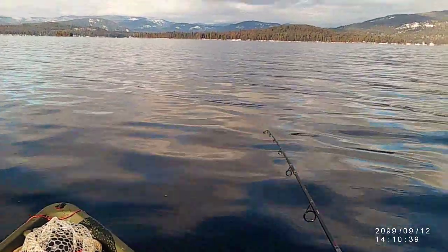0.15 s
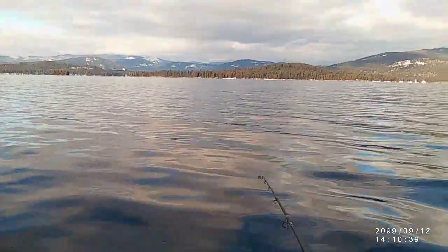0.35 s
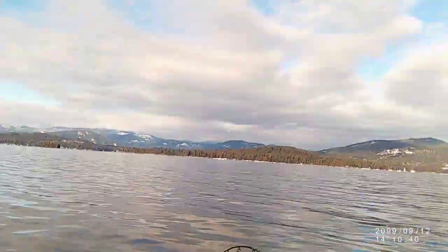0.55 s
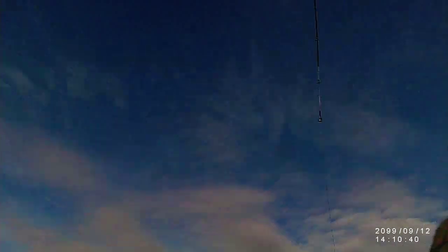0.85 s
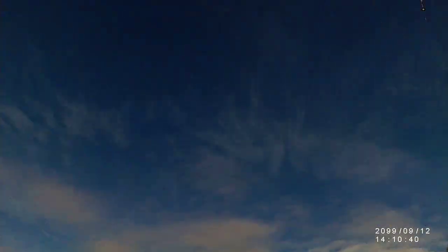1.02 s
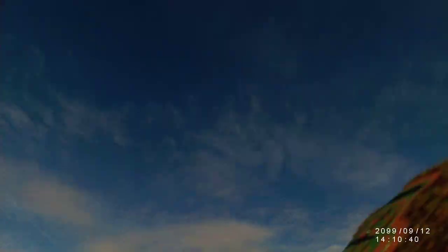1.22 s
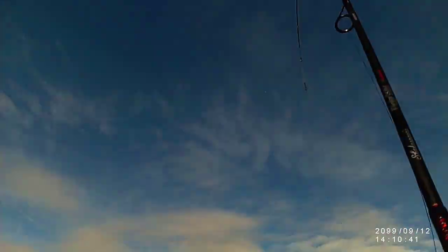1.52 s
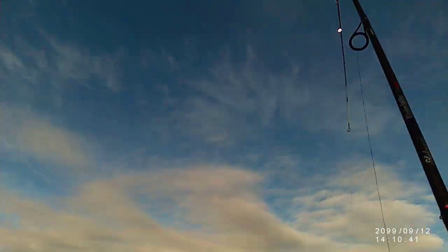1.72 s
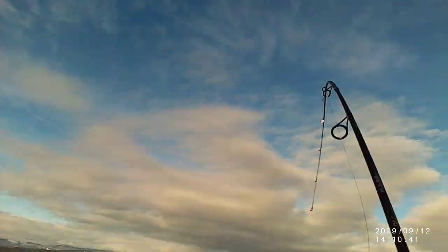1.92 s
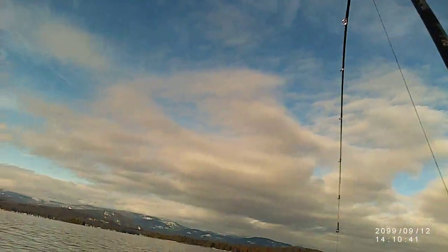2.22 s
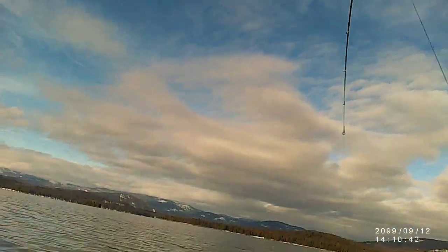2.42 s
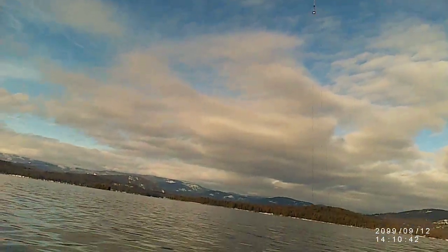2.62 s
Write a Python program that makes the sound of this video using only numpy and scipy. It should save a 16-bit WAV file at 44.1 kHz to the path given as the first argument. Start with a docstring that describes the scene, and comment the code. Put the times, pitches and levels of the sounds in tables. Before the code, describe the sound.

A spinning reel's gears whine and scrape in short bursts, clacking between pauses on a calm lake

```python
"""A spinning reel is cranked in five spurts, close to a small camera on a boat on a calm lake.
From the start, gear teeth whine as harmonics of an uneven tooth rate, over a rasp of dense grains and fine ticks.
Low noise makes the camera's rumble and the lake's wash; soft bumps and air pushes come and go.
Decaying tones knock in the handle from 0.1 s, and runs of clacks rattle the slack gears from 0.3 s.
The recorder keeps only the low treble, and adds faint hiss and whistles throughout."""
import sys
import numpy as np
from scipy import signal
from scipy.fft import rfft, irfft
from scipy.io import wavfile
from scipy.ndimage import uniform_filter1d

SR = 44100
rng = np.random.default_rng(int(sys.argv[2]) if len(sys.argv) > 2 else 0)


def dump_mix(stems):
    """Bounce the given channels to the path in sys.argv[1] as a 16-bit WAV at rate SR."""
    frames = np.atleast_2d(stems).T  # one column per channel
    limited = np.clip(frames, -1, 1)  # hard clip at full scale
    pcm = np.round(limited * 32767).astype(np.int16)
    wavfile.write(sys.argv[1], SR, pcm)


N = 121275
TIME, BINS = np.arange(N) / SR, np.fft.rfftfreq(N, 1 / SR)

# the crank's speed and its whine, before trims: t/s, tooth rate f/Hz, tone level/dB, octave level/dB
CRANK = [(0.0, 380, -58.5, -84), (0.03, 714, -54.5, -51), (0.05, 1180, -56.5, -55.5),
         (0.066, 1225, -68, -51.5), (0.102, 1458, -49.5, -64.5), (0.125, 831, -55, -47),
         (0.165, 1123, -58, -56.5), (0.19, 892, -82, -53.5), (0.219, 1384, -49, -53),
         (0.243, 1141, -71, -47.5), (0.271, 1731, -52, -57), (0.293, 1091, -62.5, -52.5),
         (0.311, 1743, -52, -66), (0.323, 1370, -56.5, -56), (0.345, 1480, -49.5, -65),
         (0.355, 997, -53.5, -56), (0.37, 539.8, -48.5, -50), (0.4, 350.2, -79, -70),
         (0.48, 251.3, -97, -71.5), (0.795, 340, -72, -73.5), (0.834, 400, -46, -53.5),
         (0.86, 498.2, -47, -55.5), (0.887, 601, -47.5, -45.5), (0.917, 733.3, -44, -56),
         (0.945, 520, -48.5, -52), (0.968, 389, -57.5, -70), (1.04, 421.5, -80.5, -57),
         (1.08, 748.6, -55, -55), (1.112, 1010, -55, -55), (1.135, 1190, -60.5, -53.5),
         (1.155, 1090, -55, -59), (1.195, 1340, -63, -61.5), (1.208, 1293, -51, -57),
         (1.232, 1687, -62, -61), (1.25, 1564, -53.5, -56), (1.272, 1780, -63, -67.5),
         (1.286, 1710, -48.5, -48.5), (1.305, 1777, -68, -66), (1.325, 1117, -47.5, -53),
         (1.352, 1198, -54, -47), (1.38, 419, -52, -56.5), (1.46, 251.1, -98, -90), (1.54, 328.7, -64, -52),
         (1.568, 430.5, -48, -56), (1.61, 654, -58.5, -49.5), (1.635, 730.5, -50, -49.5),
         (1.652, 886, -45.5, -50.5), (1.675, 1346, -52.5, -48.5), (1.69, 1325, -53, -58.5),
         (1.71, 799.6, -49, -44), (1.73, 833, -52.5, -54.5), (1.76, 1001, -49, -54.5),
         (1.78, 895, -51, -54.5), (1.803, 1152, -50, -50), (1.818, 1154, -44.5, -51),
         (1.85, 1010, -72, -59), (1.88, 1351, -52.5, -54), (1.9, 1174, -56, -60), (1.935, 1098, -69, -55),
         (1.977, 828, -48, -57), (2.007, 1308, -70, -53), (2.032, 1178, -57.5, -62),
         (2.063, 1567, -63.5, -50), (2.09, 1020, -66.5, -60.5), (2.16, 866.4, -52.5, -52.5),
         (2.2, 1328, -51.5, -70), (2.222, 1203, -62, -59), (2.24, 1450, -55, -64),
         (2.256, 1404, -52.5, -59), (2.27, 1087, -44, -58.5), (2.284, 1170, -43, -68),
         (2.302, 584.7, -49, -51), (2.37, 280, -75, -98), (2.46, 292, -78, -59), (2.495, 400, -53, -88),
         (2.53, 550, -53, -57.5), (2.57, 733, -54, -48), (2.582, 863, -54, -65), (2.608, 1233, -54.5, -56),
         (2.645, 1000, -65, -63), (2.665, 1263, -57, -59), (2.687, 1176, -68, -58), (2.705, 904, -58, -57),
         (2.75, 980, -58, -59)]
# the rasp in three bands, before trims: t/s, low level/dB, middle level/dB, treble level/dB
RASP = [(0.0, -45.5, -59, -60), (0.07, -49, -41.5, -56.5), (0.13, -44.5, -59, -59.5),
        (0.21, -58.5, -46.5, -61), (0.33, -44.5, -48, -48), (0.5, -57, -64, -70.5), (0.78, -66, -76, -73),
        (0.83, -40, -44.5, -61), (0.93, -63.5, -36, -63), (0.96, -33.5, -50, -59.5),
        (0.98, -49, -57.5, -59.5), (1.06, -46.5, -57, -65), (1.17, -54.5, -53.5, -61.5),
        (1.36, -45, -50, -49.5), (1.39, -44.5, -50, -63), (1.45, -55, -57.5, -69),
        (1.58, -44.5, -44, -57.5), (1.69, -60.5, -44, -65), (1.74, -56.5, -49, -63.5),
        (1.87, -53.5, -47, -63), (1.94, -47.5, -50.5, -52.5), (2.08, -57.5, -60.5, -62),
        (2.29, -48, -48, -54.5), (2.34, -52, -56, -57), (2.47, -64.5, -83, -87), (2.5, -44, -45, -74),
        (2.56, -50.5, -52.5, -57.5), (2.75, -68, -51, -60)]
# colour of the scraping and clacking parts: f/Hz, relative density level/dB
RASP_COLOUR = [(88, -37.5), (150, -16), (200, -13.5), (270, -10.5), (400, -4), (585, -1), (780, -6),
               (1000, 2.5), (1200, 5), (1460, 1.5), (1830, -0.5), (2050, -2.5), (2660, -8.5), (3050, -17),
               (3600, -10.5), (4140, -17), (5400, -25), (9000, -100)]
# rattles of the slack gears: start t/s, length t/s, level at the height of the swell/dB
RATTLES = [(0.276, 0.1103, -53.5), (1.299, 0.0808, -56), (1.887, 0.108, -55), (2.252, 0.058, -52)]


def amp(db):
    """Decibels to gain."""
    return 10 ** (np.asarray(db) / 20)


def unit(x):
    """Scales to rms 1."""
    return x / np.sqrt(np.mean(x ** 2) + 1e-20)


def curve(table, axis=1):
    """One column of a time table, drawn as straight lines through every sample."""
    table = np.array(table)
    return np.interp(TIME, table[:, 0], table[:, axis])


def colour(x, points):
    """Filters by a spectrum of (f/Hz, level/dB) points on a log frequency scale; rms 1."""
    hz, db = np.transpose(points)
    gain = amp(np.interp(np.log(BINS + 1), np.log(hz + 1), db))
    return unit(irfft(rfft(x) * gain, N))


def wander(hz):
    """Random drift up to about a given rate; rms 1."""
    return unit(irfft(rfft(rng.standard_normal(N)) / (1 + (BINS / hz) ** 4), N))


def add(mix, s, sound):
    """Mixes a sound in at a time in seconds."""
    part = mix[max(round(s * SR), 0):][:len(sound)]
    part += sound[:len(part)]


def uneven_hits(per_s, spread_db, drift_hz):
    """Marks hits at a mean rate that drifts, so that their gaps are uneven."""
    rate = per_s * amp(spread_db * wander(drift_hz))
    return np.diff(np.floor(np.cumsum(rate) / SR), prepend=0) > 0


def body(x):
    """The reel's housing lifts its own resonances, each a simple resonant peak on the direct sound."""
    # resonances of the housing: centre f/Hz, width f/Hz, lift level/dB
    resonances = [(420.3, 37, 5.5), (686, 27, 5), (855, 160, 6), (1229, 20, 5.5), (1415, 59, 10.5),
                  (1594, 140, 6), (1750, 82, 5), (2027, 36, 6.5), (2152, 11, 1.5), (2316, 33, 8),
                  (2680, 90, 3), (3116, 30, 11.5), (3297, 58, 3.5), (3410, 110, 1.5)]
    gain = 1 + sum((amp(db) - 1) / (1 + 2j * (BINS - hz) / width) for hz, width, db in resonances)
    return irfft(rfft(x) * gain, N)


def ring(x):
    """The many close modes of rod and reel ring on briefly, as a decaying noise tail, and bead a glide."""
    t60_s, share = 0.045, 0.38  # share of the power that rings
    t = np.arange(SR // 10) / SR
    tail = rng.standard_normal(len(t)) * amp(-60 * t / t60_s)
    ringing = signal.oaconvolve(x, tail / np.linalg.norm(tail))[:N]
    return np.sqrt(1 - share) * x + np.sqrt(share) * ringing


def slack():
    """How loose the gears run, 0 to 1: loosest in the middle of a rattle."""
    out = np.zeros(N)
    for s, length, _ in RATTLES:
        add(out, s, np.hanning(int(length * SR)))
    return out


def gears():
    """Meshing teeth: four rough harmonics of the tooth rate smear when slack; speed lifts the octave."""
    speed_jitter, slack_jitter, jitter_hz = 0.022, 0.07, 260  # jitter as a share of the rate, rms
    tooth_rough, rough_hz = 0.36, 300
    beat_db, beat_hz = 2.5, 53
    octave_lift_db, lift_from_hz = 1, 1150
    upper_fade_hz = 3700

    rate = uniform_filter1d(curve(CRANK), size=200)
    jitter = (speed_jitter + slack_jitter * slack()) * wander(jitter_hz)
    phase = 2 * np.pi * np.cumsum(rate * (1 + jitter)) / SR
    first, octave = curve(CRANK, axis=2), curve(CRANK, axis=3)
    lift = octave_lift_db / (1 + (lift_from_hz / rate) ** 8)
    levels = [first - 1.5 + 0.5, octave - 1.5 + lift, octave - 14, octave - 11]
    out = np.zeros(N)
    for k, db in enumerate(levels, 1):
        # complex noise roughens both strength and phase of the contact
        roughness = wander(rough_hz) + 1j * wander(rough_hz)
        contact = (1 + tooth_rough * roughness) * amp(beat_db * wander(beat_hz))
        tone = unit((np.exp(1j * k * phase) * contact).real)
        # the third and fourth harmonics fade as they climb
        fade = 1 / (1 + (k * rate / upper_fade_hz) ** 8) if k > 2 else 1
        out += amp(db) * fade * tone
    return ring(body(out))


def rasp(low_hz=900, high_hz=2400, flutter_db=2, flutter_hz=60):
    """Rotor and line scrape in dense tiny grains over smooth noise that ring the housing."""
    grains_per_s, spread_db, smooth = 1500, -3, 0.75
    low_db, mid_db, top_db = -6, -11, -4.5  # trims of the three bands

    hits = (rng.random(N) < grains_per_s / SR) * rng.choice([-1, 1], N)
    grains = hits * amp(spread_db * np.minimum(rng.exponential(1, N), 4))
    scrape = unit(grains) + smooth * rng.standard_normal(N)
    drive = scrape * amp(flutter_db * wander(flutter_hz))
    spectrum = rfft(body(colour(drive, RASP_COLOUR)))
    low = 1 / (1 + (BINS / low_hz) ** 8)
    top = 1 - 1 / (1 + (BINS / high_hz) ** 8)
    out = np.zeros(N)
    for k, (band, db) in enumerate([(low, low_db), (1 - low - top, mid_db), (top, top_db)], 1):
        out += unit(irfft(spectrum * band, N)) * amp(db + curve(RASP, axis=k))
    return out


def ticks():
    """Fine, separate ticks of the mechanism ring the housing and follow the treble of the rasp."""
    # colour of the ticks: f/Hz, relative density level/dB
    tick_colour = [(150, -8.5), (700, -2), (4000, -12.5), (7000, -29)]
    per_s, spread_db, trim_db = 70, 4.5, -7
    hits = uneven_hits(per_s, 5, per_s) * rng.choice([-1, 1], N)
    sizes = hits * amp(spread_db * np.minimum(rng.exponential(1, N), 3))
    return body(colour(sizes, tick_colour)) * amp(trim_db + curve(RASP, axis=3))


def handling(rumble_db=1):
    """Noise bumps, soft pushes of air as the camera jolts, and a rumble that settles as the hand rests."""
    # rumble of the moving camera, before trims: t/s, level/dB
    rumble_level = [(0.0, -38.5), (0.18, -48), (0.67, -47), (0.7, -46.5), (1.09, -47), (1.19, -46.5),
                    (1.73, -46.5), (1.75, -50), (2.5, -46), (2.58, -47), (2.62, -52.5), (2.75, -45.5)]
    # colour of the rumble: f/Hz, relative density level/dB
    rumble_colour = [(2, -22.5), (7, 6), (14, 10.5), (26, -2.5), (50, -18), (100, -21), (200, -28.5),
                     (600, -70.5)]
    # handling bumps: start t/s, length t/s, level before the swell/dB
    bumps = [(.1, 0.063, -45.5), (0.281, 0.025, -44), (0.421, 0.093, -51), (1.035, 0.065, -53.5),
             (1.25, 0.08, -50), (1.311, 0.057, -46.5), (2.179, 0.081, -45.5)]
    # colour of the bumps: f/Hz, relative density level/dB
    bump_colour = [(30, 3.5), (80, -7.5), (130, -1.5), (160, -3), (190, 3.5), (230, -5), (290, -15.5),
                   (500, -15.5), (1500, -42)]
    # pushes of air: start t/s, length t/s, peak level/dB
    pushes = [(0.038, 0.015, -37), (0.945, 0.023, -34), (1.08, 0.018, -34.5), (2.569, 0.025, -38)]
    rest_db, rest_below_hz = -5, 287  # a tooth rate below this counts as rest

    resting = 1 / (1 + (curve(CRANK) / rest_below_hz) ** 8)
    level = curve(rumble_level) + rumble_db + rest_db * resting
    out = colour(rng.standard_normal(N), rumble_colour) * amp(level)
    for s, length, db in bumps:
        thud = colour(rng.standard_normal(N), bump_colour)[:int(length * SR)]
        swell = np.sin(np.linspace(0, np.pi, len(thud)))
        add(out, s, amp(db) * thud * swell)
    for s, length, db in pushes:
        add(out, s, amp(db) * np.hanning(int(length * SR)))
    return out


def lake():
    """Faint wash of water and air: steady coloured noise."""
    # colour of the wash: f/Hz, relative density level/dB
    lake_colour = [(35, -35.5), (60, -20), (102, -6), (197, -6), (306, -3), (704, -25), (1460, -17.5),
                   (2660, -16.5), (2800, -20), (4140, -27.5), (5380, -38.5), (9110, -120)]
    return amp(-69.5) * colour(rng.standard_normal(N), lake_colour)


def knocks():
    """Play in the handle: a click of noise and a short dull ring, a decaying sine."""
    # knocks of the handle: t/s, peak level of the ring/dB, ring f/Hz, 60 dB ring time t/s
    handle_knocks = [(0.107, -33, 407, 0.015), (.304, -34.5, 500, 0.015), (.343, -34.5, 1480, 0.028),
                     (0.43, -45, 369.8, 0.075), (.9595, -28, 642, 0.026), (1.055, -34.5, 630, 0.0087),
                     (1.378, -37.5, 765, 0.023), (1.469, -51, 903, 0.007), (1.505, -42, 507, 0.027),
                     (1.56, -54, 453.5, .03), (1.728, -39.5, 845, 0.042), (1.828, -38.5, 401.5, 0.0093),
                     (1.865, -50, 458.4, 0.0077), (2.233, -37.5, 1423, 0.049), (2.374, -52, 910, 0.0041),
                     (2.428, -46, 508, 0.024)]
    click_s, click_db = 0.0008, -12  # decay constant; level against the ring
    out, t = np.zeros(N), np.arange(3000) / SR
    grit = colour(rng.standard_normal(N), RASP_COLOUR)
    for s, db, hz, t60 in handle_knocks:
        click = grit[int(s * SR):][:len(t)] * np.exp(-t / click_s)
        tone = -np.sin(2 * np.pi * hz * t) * amp(-60 * t / t60)
        add(out, s, amp(db) * (tone + amp(click_db) * click))
    return out


def rattle():
    """Unloaded teeth clack against each other in quick, uneven runs as the hand eases off."""
    per_s, spread_db = 270, 1
    hits = uneven_hits(per_s, 3, 200) * rng.choice([-1, 1], N)
    clacks = hits * amp(spread_db * rng.standard_normal(N))
    swell = np.zeros(N)
    for s, length, db in RATTLES:
        add(swell, s, amp(db) * np.hanning(int(length * SR)))
    return swell * unit(body(colour(clacks, RASP_COLOUR)))


def scene():
    """Reel, handling and lake at one microphone."""
    reel = gears() + rasp() + ticks() + knocks() + rattle()
    return (reel + handling() + lake())[None]


def record(dry):
    """A narrow-band recorder: a low-pass on the scene, then its own faint hiss and whistles, then a top cut."""
    # whistles of the recorder: f/Hz, peak level/dB
    whistle_tones = [(6000, -105), (7500, -104), (9000, -99), (10500, -103), (12000, -88)]
    cutoff_hz, hiss_db = 4100, -93  # hiss level before the top cut
    treble_cut = signal.firwin(161, cutoff_hz, window=("kaiser", 7), fs=SR)[None]
    top_cut = signal.firwin(511, 13500, window=("kaiser", 9), fs=SR)[None]
    narrow = signal.oaconvolve(dry, treble_cut, "same")
    whistles = sum(amp(db) * np.sin(2 * np.pi * hz * TIME) for hz, db in whistle_tones)
    out = narrow + amp(hiss_db) * rng.standard_normal(N) + whistles
    return signal.oaconvolve(out, top_cut, "same")


dry = scene()
out = record(dry)
dump_mix(out)
```